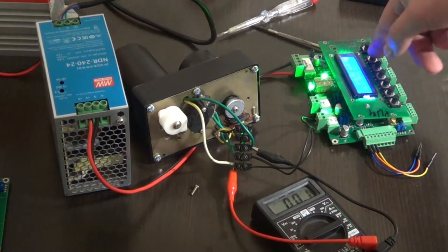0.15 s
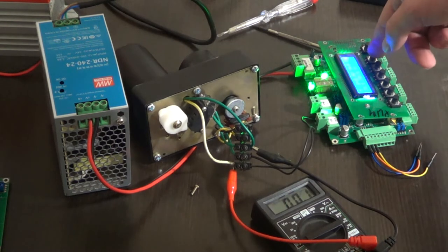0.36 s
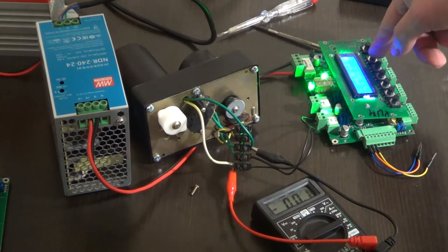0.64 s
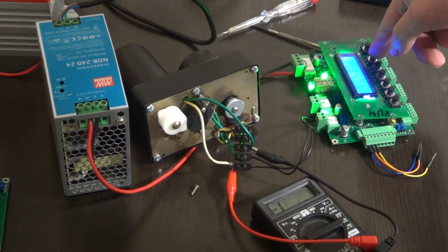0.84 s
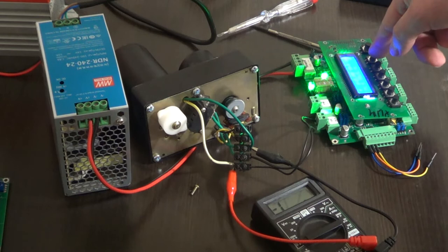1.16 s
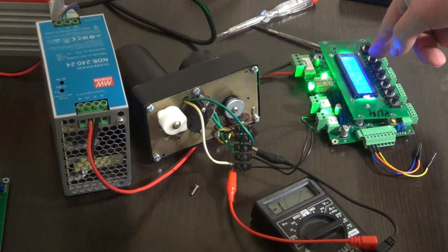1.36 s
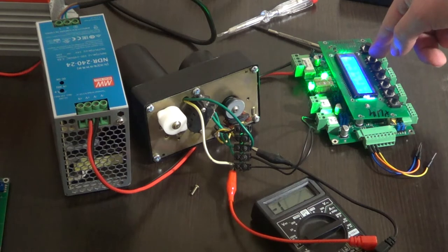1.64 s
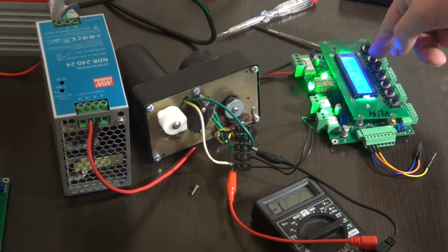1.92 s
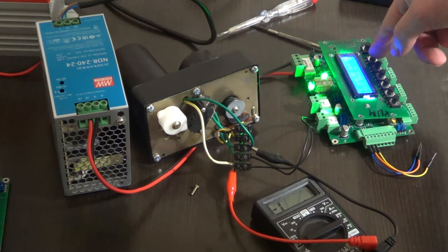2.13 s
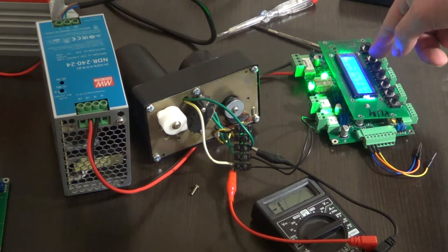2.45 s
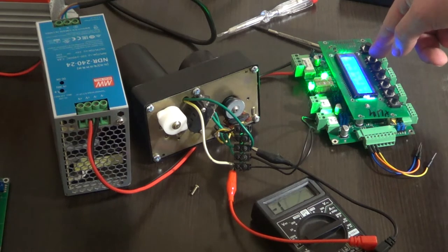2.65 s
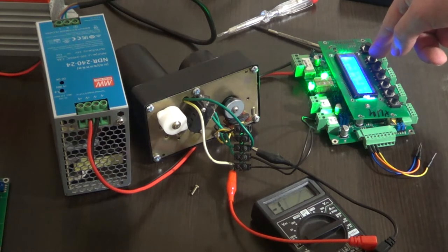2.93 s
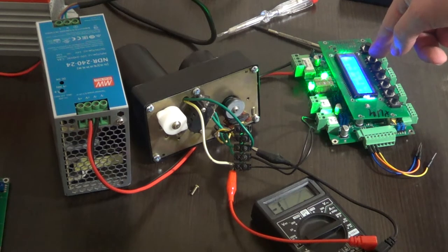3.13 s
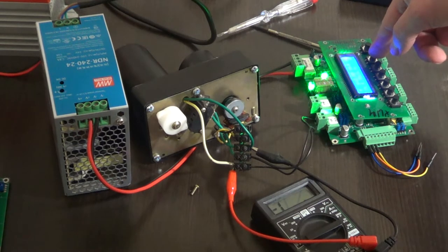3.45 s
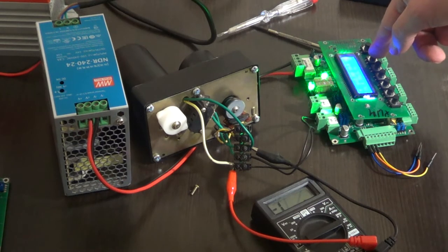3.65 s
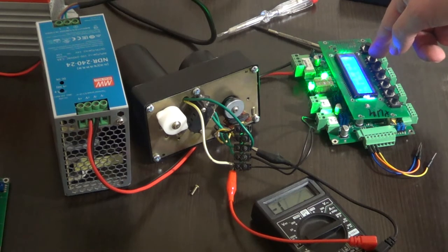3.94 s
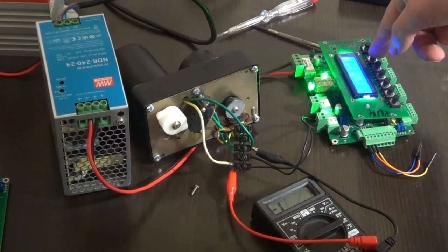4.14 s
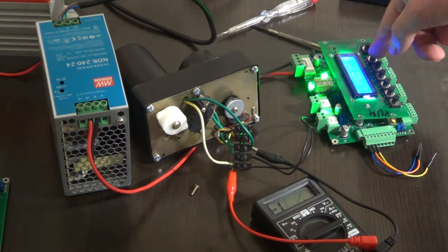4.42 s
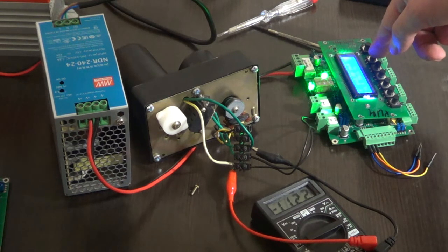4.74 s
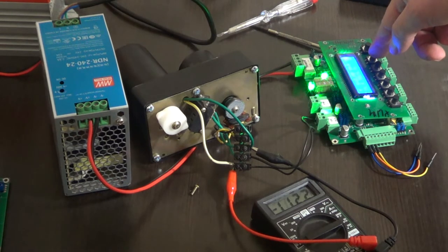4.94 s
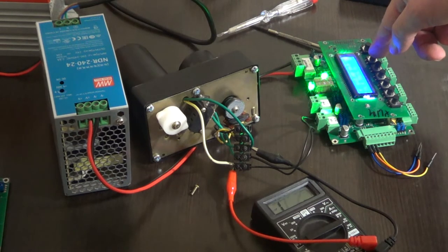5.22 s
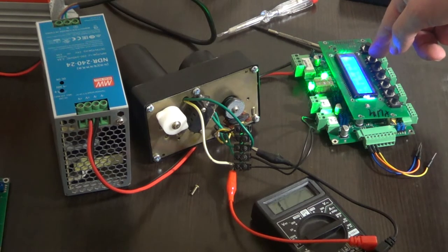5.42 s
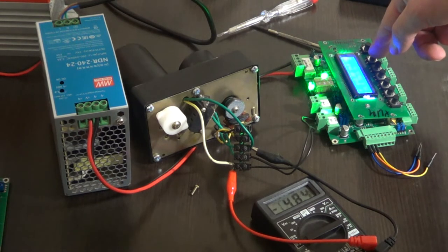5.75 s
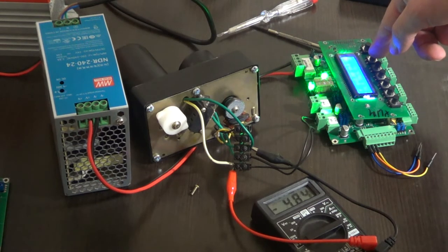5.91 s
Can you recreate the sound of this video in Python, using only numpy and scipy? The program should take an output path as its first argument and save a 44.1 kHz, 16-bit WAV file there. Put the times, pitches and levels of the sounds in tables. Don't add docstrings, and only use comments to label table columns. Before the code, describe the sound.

A quiet room with soft air hiss, low mains hum, a very high thin screen whistle and faint fluttering electronic chirps. At about 0.4 s a soft relay click is followed by a heavy dull thump at 0.44 s, with several quick bounces as a motor housing knocks the wooden bench. The small gear motor reaches speed almost instantly and runs until 4.5 s: a steady, gritty whine around 5 kHz, brush ticking and fizz, rattling gears, low bench rumble and a piercing switching tone near 3.4 kHz. It thickens over the first second or two and its pitch settles very slightly. At 4.5 s a loud, bright relay snap with tiny bounces ends the drive. The whine drops away, and gear tones slide lower through a rough chatter, slowing to a stop near 4.9 s. Until about 6 s, only hiss, hum, whistle and the faint drive tone remain, close-miked with a short room echo.

```python
import sys
import numpy as np
from scipy import signal
from scipy.fft import rfft, irfft, next_fast_len
from scipy.io import wavfile
from scipy.ndimage import uniform_filter1d, map_coordinates

SR = 44100
rng = np.random.default_rng(int(sys.argv[2]) if len(sys.argv) > 2 else 0)


def amplitude_ratio(level_db):
    exponent = np.asarray(level_db, float) / 20
    return 10 ** exponent


def master(y):
    cut = np.clip(np.atleast_2d(y).T, -1, 1)
    pcm = np.round(cut * 32767)
    wavfile.write(sys.argv[1], SR, pcm.astype(np.int16))


N = 267907
T = np.arange(N) / SR


def unit(x):
    return x / np.sqrt(np.mean(x ** 2) + 1e-20)


def along(points, hz):
    f, v = np.transpose(points)
    return np.interp(np.log(hz + 1), np.log(f + 1), v)


def wobble(rate):
    return map_coordinates(rng.standard_normal(int(N * rate / SR) + 4), [T * rate])


def filtered(x, response):
    m = next_fast_len(N + 8192)
    return irfft(rfft(x, m) * response(np.fft.rfftfreq(m, 1 / SR)), m)[..., :N]


def resonances(modes, hz):
    return sum(amplitude_ratio(2 * db) / (1 + (1.36 * (hz - c) / w) ** 2) ** 2 for c, w, db in modes)


def pair(one, other, alike):
    turn = lambda hz: np.arccos(np.clip(along(alike, hz), -1, 1)) / 2
    mid, side = filtered(np.array([one, other]), lambda hz: [np.cos(turn(hz)), np.sin(turn(hz))])
    return np.array([mid + side, mid - side])


# (frequency [Hz], time to fall 60 dB [s])
ECHO = [(200, 0.4), (2000, 0.72), (12000, 0.12)]


def room(x):
    hz, t, z = signal.stft(rng.standard_normal((2, SR // 2)), SR, nperseg=256)
    tail = signal.istft(z * amplitude_ratio(-60 * t / along(ECHO, hz)[:, None]), SR, nperseg=256)[1]
    late = np.pad(x, (200, 0))[None]
    return signal.fftconvolve(late, tail / np.linalg.norm(tail[0]), axes=1)[:, :N]


# (frequency [Hz], level [dB])
AIR = [(15, -50), (25, -11), (120, -3.5), (299, -4), (361, -3.5), (414, -2.5), (1930, -10), (3130, -10),
       (3390, -12.5), (3680, -11), (7030, -15), (13100, -20.5), (15800, -27)]
# (frequency [Hz], likeness [-1 to 1])
AIR_ALIKE = [(60, 0.94), (180, 0.91), (550, 0.18), (1650, 0.081), (4970, 0.42), (15000, 0.85)]
# (frequency [Hz], level [dB rms])
STEADY = [(120, -67), (241, -66), (360, -59), (5636, -80), (15525, -76), (15575, -73), (15625, -63),
          (15675, -74), (15725, -76)]


def floor():
    whistle_band = lambda hz: amplitude_ratio(-18) / (1 + ((hz - 15620) / 180) ** 4)
    air = pair(*rng.standard_normal((2, N)), AIR_ALIKE)
    air = unit(filtered(air, lambda hz: amplitude_ratio(along(AIR, hz)) + whistle_band(hz)))
    hum = sum(amplitude_ratio(db + 1.5 * wobble(14)) * np.sin(2 * np.pi * (hz * T + rng.random())) for hz, db in STEADY)
    bursts_per_s, middle_s = 25, .015
    gate = np.cos(np.pi * bursts_per_s * (T - middle_s)) ** 6
    bursts = amplitude_ratio(-62.5 + .9 * wobble(27)) * gate * np.sin(2 * np.pi * 4339 * T)
    return amplitude_ratio(-53 + 0.17 * wobble(2.3)) * air + np.sqrt(2) * hum + bursts


ON_S, OFF_S = .3865, 4.497
SPIN_UP_S, COAST_S = .024, .87
FRICTION = 2.0
SETTLE_S = 0.74
STALL = 0.02


def shaft():
    gained = 1 - np.exp(-np.clip(T - ON_S, 0, None) / SPIN_UP_S)
    left = (1 + FRICTION) * np.exp(-np.clip(T - OFF_S, 0, None) / COAST_S) - FRICTION
    return gained, np.clip(left, 0, 1)


def swell_db(settled_db, start_db, power):
    missing = np.exp(-np.clip(T - ON_S, 0, None) / SETTLE_S)
    return settled_db - start_db * missing + 20 * power * np.log10(shaft()[1] + STALL)


# (settled level [dB], lower at the start [dB], power of coasting speed,
# idle level [dB])
CHOP = [(-35.5, 6.4, 1.33, -54.5), (-54, 2, 6.7, -63.5), (-49, 2.2, 0.45, -71), (-67, 1.5, .9, -67.5)]


def chopper():
    chop_hz = 3438.3
    gained, left = shaft()
    tone = 0
    for k, (*law, idle_db) in enumerate(CHOP):
        driven = amplitude_ratio(swell_db(*law)) * (.3 + 0.62 * gained ** 2) * np.clip(left / STALL, 0, 1)
        wander = amplitude_ratio(0.46 * wobble(11) + .7 * wobble(2.54))
        tone = tone + (amplitude_ratio(idle_db) + driven) * wander * np.sin(2 * np.pi * (k + 1) * chop_hz * T)
    return np.sqrt(2) * tone * (T > ON_S)


def ring(contacts, modes, attack, crack, blur, tilt):
    out, t = np.zeros(N + SR), T[:SR // 2]
    for s, db in contacts:
        first = s == contacts[0][0]
        drift = blur * np.cumsum(rng.standard_normal((len(modes), len(t))), axis=1)
        tone = 0
        for (hz, level, t60), slip in zip(modes, drift):
            fade = amplitude_ratio(level + rng.normal(0, 2.8) - 60 * t / t60)
            tone = tone + fade * np.sin(2 * np.pi * hz * t + slip + np.pi * first)
        snap = crack * amplitude_ratio(-60 * t / 0.01) * rng.standard_normal(len(t))
        snap = signal.lfilter([1, -tilt], [1, -.8 * (1 - tilt)], snap)
        out[round(s * SR):][:len(t)] += amplitude_ratio(db) * (tone + snap) * (1 - np.exp(-t / attack))
    return out[:N]


# (time [s], level [dB])
RELAY = [
    (0.3866, -47),
    (4.5172, -17),
    (4.5245, -33),
    (4.533, -36),
]
# (frequency [Hz], level [dB], time to fall 60 dB [s])
CASE = [(4340, -10, .05), (5750, 3, .03), (5905, -12, .13), (6735, -9, .05), (8100, -11, .06),
        (9700, -1, .02), (10300, -5, .06), (11600, 5, .02), (12600, 2, .025), (13500, -2, .02),
        (14770, -12, .015)]


def relay_clicks():
    clicks = ring(RELAY, CASE, attack=.0002, crack=2.8, blur=.11, tilt=.6)
    return filtered(clicks, lambda hz: (1j * hz / (3500 + 1j * hz)) ** 2 / (1 + (hz / 15000) ** 8))


# (time [s], level [dB])
THUMPS = [
    (0.4372, -21),
    (0.4385, -16),
    (0.4452, -16.5),
    (0.4535, -25),
    (0.486, -27),
]
# (frequency [Hz], level [dB], time to fall 60 dB [s])
STRUCK = [(150, -18, .04), (203, -14, 0.083), (271.5, -6.5, .65), (300, -2.5, .08), (324, -5, 0.29),
          (389, 0, 0.086), (443, -5.5, 0.11), (535, -10.5, 0.18), (642, -2.5, 0.1), (816, -9.5, 0.068),
          (1079, -11, 0.11), (1260, -5, 0.065), (1484, -3, 0.034), (1710, -15, .07), (1954, -13, 0.045),
          (2780, -21, .04), (4750, -14, 0.051), (6400, -21, 0.051)]


def bench_thumps():
    thumps = ring(THUMPS, STRUCK, attack=.0005, crack=.9, blur=.02, tilt=0)
    return filtered(thumps, lambda hz: 1 / (1 + 1j * hz / 9000) ** 2)


def jolt():
    start_s, length_s = 0.4385, .0105
    return amplitude_ratio(-13) * np.sin(2 * np.pi * np.clip((T - start_s) / length_s, 0, 1))


# (frequency [Hz], width [Hz], level [dB])
BENCH = [(50, 120, -36), (211, 44, -3.5), (293, 88, -1.5), (312, 44, -2), (392, 75, -4), (444, 12, 1),
         (560, 84, -35)]
# (frequency [Hz], likeness [-1 to 1])
ALIKE = [(60, 0.99), (130, 1), (290, 1), (640, 0.89), (1410, 0.72), (3100, 0.89), (6820, 0.9), (15000, 1)]


def bench_rumble(bench_db):
    lumps = amplitude_ratio(1.0 * wobble(30)) * rng.standard_normal((2, N))
    rumble = filtered(pair(*lumps, ALIKE), lambda hz: np.sqrt(resonances(BENCH, hz)))
    return unit(rumble) * amplitude_ratio(bench_db + 2.0)


# (frequency [Hz], width [Hz], level [dB])
HOUSING = [(860.6, 47, -9.5), (1080, 316, -15), (1425, 77, -11), (1650, 81, -6.5), (1808, 11.4, -10),
           (2342, 59, -11.5), (2658, 88, -14.5), (2938, 75, -9.5), (3290, 75, -1), (3560, 130, -8.5),
           (3734, 81, -9), (4080, 85, -18), (4190, 130, -23.5), (4365, 146, -11), (5000, 220, -35),
           (4860, 29, -9), (5240, 300, -15), (5340, 43, -10), (3271, 18.7, 2), (6200, 65, -46),
           (6900, 74, -18.5), (7320, 84, -12.5), (9950, 190, -21), (10314, 49, -19), (10869, 167, -36)]
# (frequency [Hz], level [dB per Hz])
BETWEEN = [(400, -29), (700, -24), (2100, -22), (3300, -20), (5000, -26.5), (6500, -19), (9000, -28.5),
           (10300, -23), (13000, -40), (15500, -40)]


def gear_rattle(clumps, rattle_db, hiss_db):
    body = lambda hz: np.sqrt(resonances(HOUSING, hz) + amplitude_ratio(2 * along(BETWEEN, hz)))
    knocks = clumps * rng.standard_normal((2, N))
    rattle = unit(filtered(pair(*knocks, ALIKE), body))
    low = filtered(rattle, lambda hz: 1 / (1 + (hz / 5500) ** 8))
    return low * amplitude_ratio(rattle_db - 0.5) + (rattle - low) * amplitude_ratio(hiss_db + 7)


# (cycles a turn, level [dB rms])
MESH = [(5, -58), (10, -39.8), (20, -45), (30, -49), (40, -48), (50, -56), (60, -52)]
# (frequency [Hz], level [dB rms])
GLIDE = [(100, -75), (220, -47), (330, -36), (490, -37), (580, -48), (700, -47), (900, -46), (1200, -39),
         (1450, -40), (1600, -58), (2500, -66)]


def gears(turns, speed):
    off = np.clip((1 - speed) / .12, 0, 1)
    turns_per_s = np.gradient(turns) * SR
    out = 0
    for k, db in MESH:
        glide_db = along(GLIDE, k * turns_per_s) - (0 if k in (10, 20, 30) else .6 * k)
        glide_db = glide_db + 14 * np.log10(speed + STALL)
        level = db + off * (glide_db - db) + (.8 + 2 * off) * wobble(35)
        cycles = k * turns + rng.random() + .08 * off * wobble(60)
        out = out + amplitude_ratio(level) * np.sin(2 * np.pi * cycles)
    chatter = amplitude_ratio(1.2 * wobble(90)) * rng.standard_normal(N)
    chatter = filtered(chatter, lambda hz: resonances([(800, 800, 0)], hz))
    return out + amplitude_ratio(-45) * off * (T > 1) * unit(chatter)


# (frequency [Hz], level [dB])
TICKS = [(2500, -31), (4500, 9), (6000, -3), (8500, -0.5), (10200, -9.5), (12500, -3), (15500, -34)]


def brush_ticks(turns, speed, hiss_db):
    track = rng.standard_normal(720) * amplitude_ratio(14 * rng.standard_normal(720))
    ticks = map_coordinates(track, [turns % 1 * len(track)], mode="grid-wrap")
    ticks = ticks * speed ** 3 * amplitude_ratio(1 * wobble(39.8))
    return unit(filtered(ticks, lambda hz: amplitude_ratio(along(TICKS, hz)))) * amplitude_ratio(hiss_db - 3.5)


def brush_fizz(clumps, hiss_db):
    top = lambda hz: (hz / 13000) ** 6 / (1 + (hz / 13000) ** 18)
    return unit(filtered(clumps * rng.standard_normal(N), top)) * amplitude_ratio(hiss_db - 16)


# (cycles a turn, level [dB rms])
TONES = [(80, -43), (81, -52), (82, -43), (83, -52), (84, -41.5), (85, -57), (86, -59), (88, -55),
         (89, -58), (90, -53), (92, -60), (98, -56), (99, -58), (100, -50), (110, -54), (112, -58),
         (116, -58), (128, -62), (138, -62), (159, -57), (164, -60), (165, -61), (171, -63), (179, -63),
         (183, -61), (195, -62)]


def brush_whine(turns, speed):
    whine = 0
    for k, db in TONES:
        level = amplitude_ratio(db + (.9 + .006 * k) * wobble(22)) * speed ** 9
        whine = whine + level * np.sin(2 * np.pi * (k * turns + .012 * (k - 82) ** 2))
    return whine


def motor():
    gained, left = shaft()
    speed = gained * left
    whine_hz = 5088.7 + 15 / (1 + np.exp((T - 2.1) / .2))
    turns = np.cumsum(speed * whine_hz * (1 + 0.00042 * wobble(9))) / SR / 80
    on = np.clip((T - ON_S) / 0.00085, 0, 1) * uniform_filter1d(1. * (left > 0), size=SR // 12)
    rattle_db = swell_db(-30, 3.8, 1.4)
    bench_db = swell_db(-46.5, 0.67, 0.45) - 12 * (1 - gained)
    hiss_db = swell_db(-41.5, 8.3, 0.72) - 9 * (1 - gained)
    mesh_db = swell_db(0, 7.1, 0.55)
    whine = brush_whine(turns, speed) * amplitude_ratio(hiss_db + 40.5)
    tones = np.sqrt(2) * (whine + gears(turns, speed) * amplitude_ratio(mesh_db))
    clumps = amplitude_ratio(1.36 * wobble(160) + 0.51 * wobble(24.95) + 1.55 * np.sin(4 * np.pi * turns))
    tones = tones + brush_ticks(turns, speed, hiss_db) + brush_fizz(clumps, hiss_db)
    noise = gear_rattle(clumps, rattle_db, hiss_db) + bench_rumble(bench_db)
    return on * tones, on * noise


# (frequency [Hz], level [dB])
LEAN = [(60, -1), (110, 0.5), (200, 1.0), (380, 0.81), (700, 1.5), (1290, 1.3), (2380, -1.2), (4400, -0.47),
        (8120, 2.5), (15000, -3)]
# (frequency [Hz], phase [rad])
LEAD = [(0, 0), (1290, 0.45), (2670, 0.16), (3100, 0), (3450, 0.37), (3790, 0.83), (4130, 0.62),
        (5250, 0.38), (6030, 0.62), (6890, 1), (7150, 0.5), (8610, 0.99), (10300, 0.22), (16400, -0.0)]


def scene():
    tones, noise = motor()
    thump, relay = bench_thumps(), relay_clicks()
    near = tones + chopper() + thump + relay + noise
    lean = lambda hz: amplitude_ratio(along(LEAN, hz) / 2) * np.exp(.5j * along(LEAD, hz))
    near = filtered(near, lambda hz: [lean(hz), 1 / lean(hz)])
    echoes = amplitude_ratio(-15.5) * room(tones) + amplitude_ratio(-13.5) * room(noise.mean(axis=0)) + amplitude_ratio(-10.5) * room(thump)
    echoes = echoes + amplitude_ratio(-14.0) * room(relay) + amplitude_ratio(-4) * room(relay)[0]
    return near + echoes + amplitude_ratio([[-16], [0]]) * jolt() + floor()


def band_limit(x):
    return signal.sosfilt(signal.butter(12, 16790, fs=SR, output="sos"), x)


def record(dry):
    mix = filtered(dry, lambda hz: hz < 15780)
    return band_limit(mix)


dry = scene()
out = record(dry)
master(out)
```